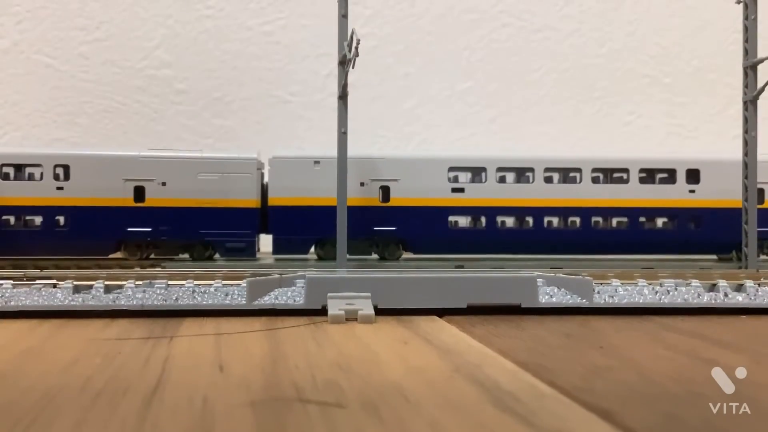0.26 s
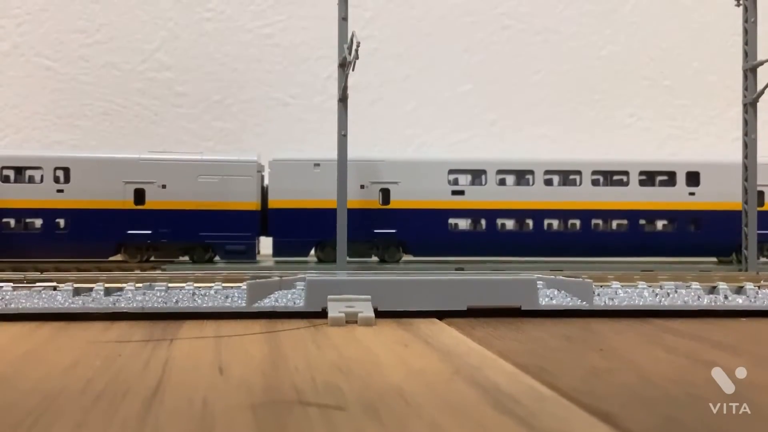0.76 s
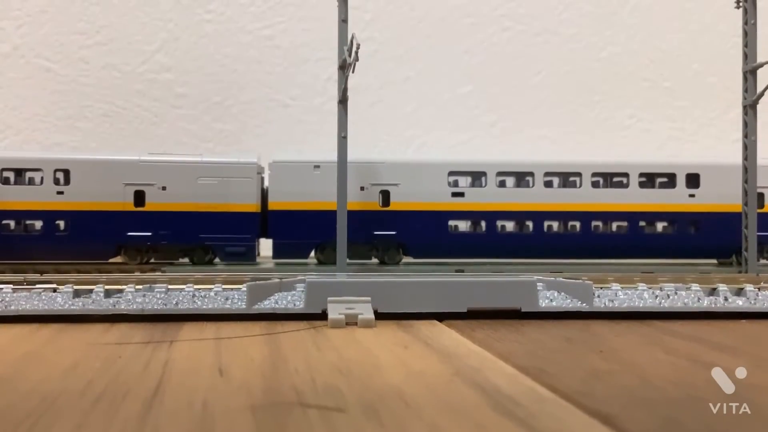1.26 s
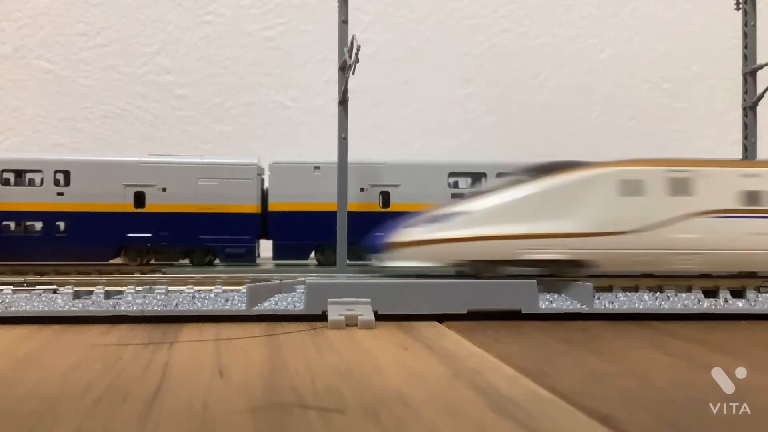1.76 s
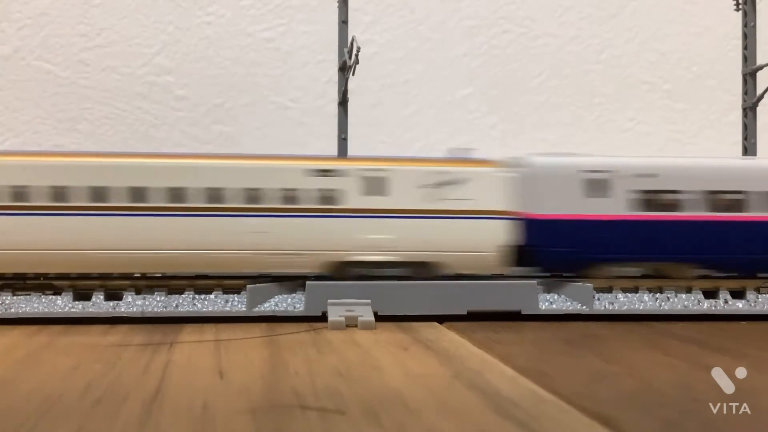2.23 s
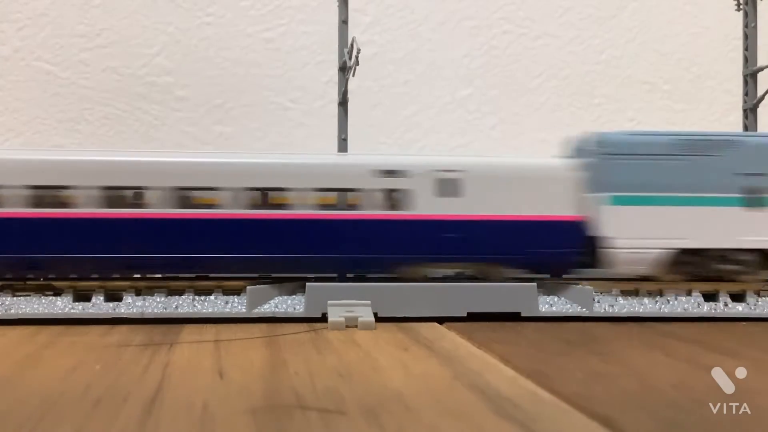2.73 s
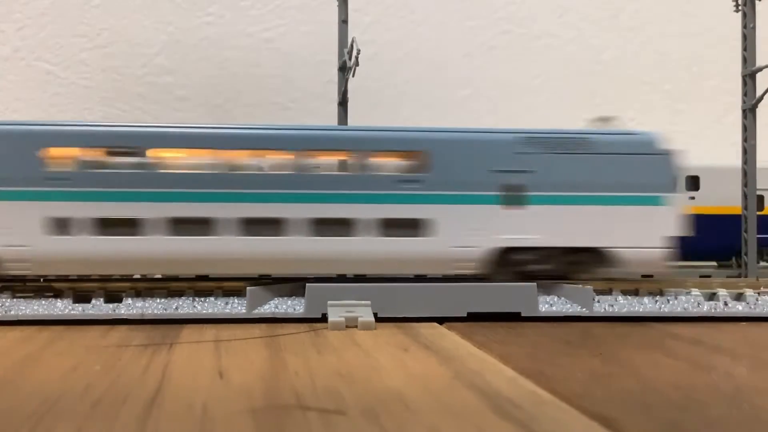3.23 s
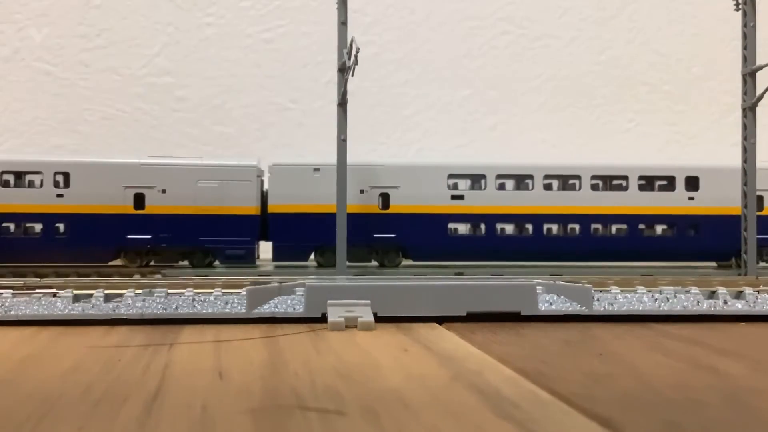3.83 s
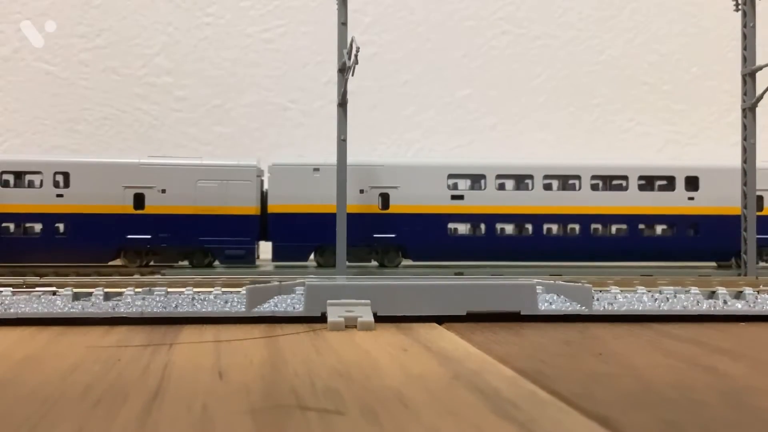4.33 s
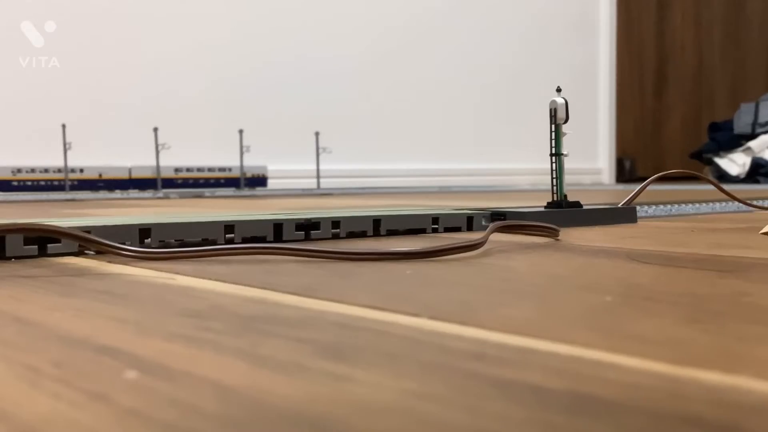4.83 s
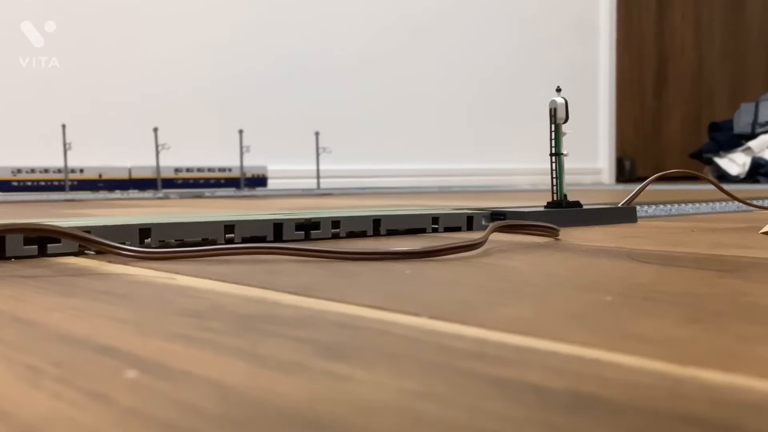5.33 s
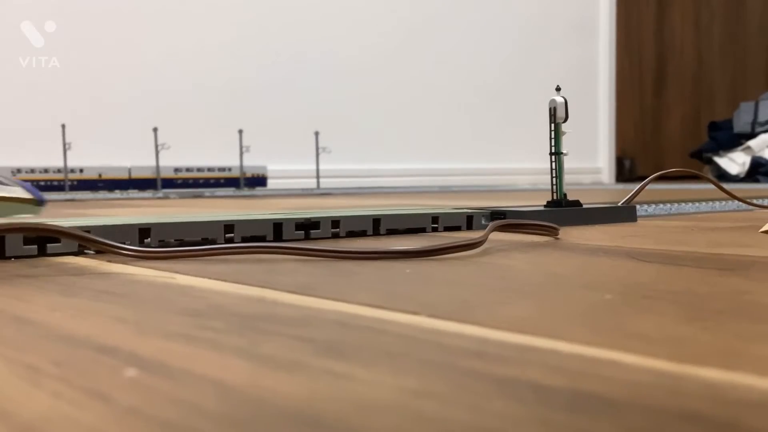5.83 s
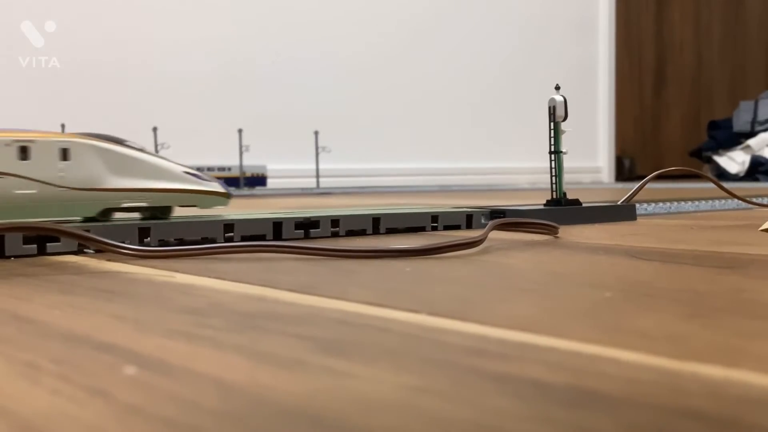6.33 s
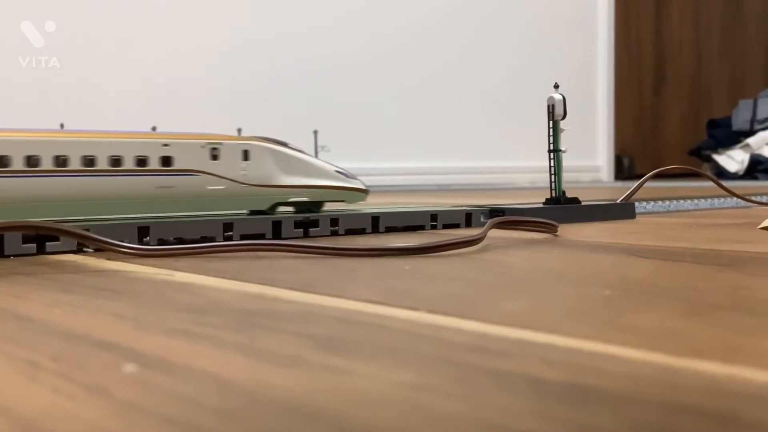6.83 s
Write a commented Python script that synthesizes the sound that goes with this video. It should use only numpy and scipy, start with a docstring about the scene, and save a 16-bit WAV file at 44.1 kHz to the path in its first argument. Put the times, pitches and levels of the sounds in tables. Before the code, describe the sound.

A small model train rolls on plastic track indoors, with a low room hum throughout. From the start its metal wheels hiss, with brief thin ringing from the rails and a hollow resonance from the plastic cars. It grows louder from about 2 seconds, joined by a faint warbling motor whine. From around 2.5 to 4 seconds it passes very close to the microphone: gears whirr and clatter, the motor throbs rapidly, and the bright hiss takes on a downward sweep, loudest between 3 and 4 seconds. The sound eases slightly, then at about 4.6 seconds cuts with a very brief rush to the train heard from across the room. The rolling is now much fainter and steady. From about 4.9 seconds to the end, near 7, the wheels click irregularly over rail joints with slight room echo, most clearly around 5.5 and 6.6 seconds.

```python
"""A model train runs past on plastic track laid on a wooden floor, a hand's width away.
Its small metal wheels hiss and sing on the rails, and its hollow car shells ring. The motor car
whirrs, whines and clatters as it goes by, throbbing once per turn of the drive wheels.
Then, abruptly, the train is heard from across the room, ticking over rail joints.
A low room hum lies under both views."""
import sys
import numpy as np
from scipy import signal
from scipy.fft import rfft, irfft, next_fast_len
from scipy.io import wavfile

SR = 44100
rng = np.random.default_rng(int(sys.argv[2]) if len(sys.argv) > 2 else 0)


def unload_audio(sound):
    """Save the sound as a 16-bit wav file, at the path given as the first command line argument."""
    columns = np.transpose(np.atleast_2d(sound))
    # keep every value between -1 and 1, then stretch to whole-number steps
    steps = np.round(np.clip(columns, -1, 1) * 32767)
    wavfile.write(sys.argv[1], SR, steps.astype(np.int16))


N = 311787
TIME = np.arange(N) / SR
ACROSS_ROOM_S = 4.575   # the listener jumps from trackside to across the room
WHEEL_HZ, PEAK_LOAD_S = 11.75, 3.96   # turn rate of the drive wheels; one moment of greatest load

# Tone of the wheel hiss. Each row: frequency in Hz, relative level in dB.
HISS_SPECTRUM = [(3650, -28), (6200, -5), (6400, -41), (6580, -10.5), (7380, -6), (10600, 2), (12600, -6.5),
                 (14500, -10), (15400, -12), (16000, -28)]
# Sweep of the notch cut by the floor reflection. Each row: time in seconds, cancelled frequency in Hz.
FLOOR_NOTCH = [(2.6, 14600), (2.85, 12500), (3.05, 10300), (3.3, 8800), (3.7, 7700), (4.0, 8160),
               (4.3, 10900)]
# Resonances that swell and fade once, near and far: rails and wheels singing out, and bright # treble peaks
# that rise as the cars leave. Each row: peak time in seconds, length in seconds, # pitch in Hz, bandwidth in
# Hz, level in dB, glide in Hz per second.
RINGING_SWELLS = [(0.025, 0.2, 3420, 200, -39, 0), (0.12, 0.33, 4970, 200, -46, -3),
                  (0.38, 0.47, 3990, 250, -43.5, 0), (0.603, 0.19, 3500, 220, -39.5, 401),
                  (0.85, 0.34, 5270, 400, -39, 900), (1.006, 0.18, 4080, 200, -41, 0),
                  (1.15, 0.19, 5860, 200, -48, 400), (1.344, 0.45, 1677, 320, -42.5, 0.5),
                  (2.05, 0.53, 3220, 260, -39, 499.5), (1.95, 1, 10280, 550, -41.5, 1),
                  (2.4, 0.25, 2840, 280, -42, -0.5), (2.826, 0.19, 1775, 262, -32, -4),
                  (2.85, 0.71, 5250, 700, -32.5, -1200), (3.053, 0.3, 4570, 350, -28.5, -3),
                  (2.88, 0.48, 8530, 1100, -40, -3000), (3.082, 0.24, 11200, 700, -39, -2000),
                  (3.399, 1, 1579, 159, -34, 100), (3.25, 0.63, 3778, 399.3, -27, -350),
                  (3.703, 0.077, 4535, 260, -24, 0), (3.867, 0.34, 5900, 379, -37.5, -1),
                  (3.84, 0.24, 5010, 220, -35, 0), (3.985, 0.041, 3800, 260, -27, 0),
                  (4.1, 0.3, 3170, 220, -36.5, -0.5), (4.12, 0.5, 4480, 550, -35.5, 0.5),
                  (4.13, 0.36, 3350, 150, -36.5, 1), (4.417, 0.26, 3300, 340, -35.5, 600.5),
                  (4.25, 0.4, 2260, 170, -42, 0), (4.036, 0.24, 12000, 800, -39, 8002),
                  (4.17, 0.16, 8600, 250, -37.5, 5), (4.382, 0.58, 8990, 850, -40, 2500),
                  (4.501, 0.75, 2605, 554, -39.5, 0), (5.0, 0.8, 3540, 330, -56, 0),
                  (5.15, 0.52, 2320, 905, -54, -1), (5.534, 0.12, 2370, 900, -54, 4),
                  (5.618, 0.38, 5720, 350, -58, 0), (5.997, 0.14, 2470, 900, -55.5, 0),
                  (6.45, 0.1, 2420, 700, -57, -2.5), (6.753, 0.3, 2300, 400, -55, -700),
                  (6.92, 0.34, 5200, 350, -59.5, 1)]


def wheel_hiss(nearness):
    """Metal wheels hiss on the rails; the floor's echo sweeps a notch, and a parked train adds its own."""
    # Fader ride of the hiss. Each row: time in seconds, relative level in dB.
    hiss_levels = [(0.0, -36.5), (0.09, -37.5), (0.47, -35), (1.59, -33.5), (2.04, -31.5), (2.7, -33.5),
                   (3.21, -34), (3.7, -29.5), (4.37, -35.5), (4.56, -31.5)]
    # Finest hiss, heard only abreast of the motor car.
    # Each row: time in seconds, centre in Hz, relative level in dB.
    sizzle_curve = [(3.58, 13500, -60), (3.66, 13380, -37), (3.78, 13490, -41), (3.95, 14100, -37.5),
                    (4.06, 14600, -43), (4.17, 15000, -60)]
    hiss = colour(contacts(per_s=7000, spread_db=4.5, smooth=0.76), HISS_SPECTRUM)
    notch_hz, = in_time(FLOOR_NOTCH)
    floor_lag_s = 1 / (2 * notch_hz * (1 + 0.012 * drift(3.7)))   # half a cycle late
    parked_lag_s = 0.000286 * nearness ** 0.12
    floor_echo, parked_echo = delayed(hiss, [floor_lag_s, parked_lag_s])
    floor_gain = np.interp(TIME, [2.25, 2.6, 3.2, 3.7], [0, 0.37, 0.37, 0.2257])   # cars block a part
    parked_gain = np.interp(TIME, [3.15, 3.6], [0, 0.068])
    combed = hiss + floor_gain * floor_echo + parked_gain * parked_echo
    combed /= np.sqrt(1 + floor_gain ** 2 + parked_gain ** 2)
    ride_db, = in_time(hiss_levels)
    hiss_db = ride_db + 1.1 + 9.3 * floor_gain - 2.3 * nearness ** 2
    load_db = 1.4 * motor_presence() * throb(lead_s=0.0012) + 0.5 * drift(21)
    sizzle_hz, sizzle_db = in_time(sizzle_curve)
    sizzle = from_db(sizzle_db) * mode_noise(sizzle_hz, width_hz=1500)
    return from_db(load_db) * (from_db(hiss_db) * combed + sizzle)


def gears(level_db, nearness):
    """Gear teeth and loose bogies rattle the motor car; its resonances stand out when it is near."""
    # Knocks of the motor car. Each row: start in seconds, relative level in dB.
    clatter_hits = [(2.5394, -6), (2.7206, -7), (2.9801, -1), (3.031, -2.5), (3.1157, -6), (3.154, 0),
                    (3.3826, -4), (3.408, -3.5), (3.4714, -2), (3.5514, -4.5), (3.712, -5.5), (3.7236, -3),
                    (3.8198, -7), (3.898, -4), (3.9735, -10)]
    # Tone of the whirr, some way off and close up. Each row: frequency in Hz, relative level in dB.
    approach_spectrum = [(1180, -22), (2000, -14.5), (2500, -7), (3270, -2.5), (3680, -4.5), (3950, -1),
                         (4400, -3), (5310, -4), (6040, -8), (6500, -16.5), (8450, -15), (14300, -120)]
    close_spectrum = [(1180, -32.5), (2000, -5), (2450, -7.5), (2770, -10.5), (3010, -4.5), (3260, -9),
                      (3720, 1.3), (4190, -4), (4560, 2), (5230, -12.5), (5920, -9), (6160, -21),
                      (6500, -56), (8450, -32), (14300, -120)]
    rattle = contacts(per_s=2400, spread_db=3.5, smooth=0.51)
    knocks = np.zeros(N)
    for start_s, db in clatter_hits:
        add(knocks, start_s, from_db(db - 10.5) * chatter(ring_s=0.0069, rebound=0.32, rise_s=0.0016))
    approach = colour(contacts(per_s=8000, spread_db=2.0, smooth=1.08), approach_spectrum)
    close_share = nearness ** 1.1
    whirr = np.sqrt(1 - close_share) * approach + np.sqrt(close_share) * colour(rattle, close_spectrum)
    load_db = 1.8 * motor_presence() * throb(lead_s=0)
    flutter_db = 0.78 * drift(46)
    return from_db(level_db + load_db + flutter_db - 0.1) * whirr + colour(knocks, close_spectrum)


def chassis(whirr_db):
    """The lowest mode of the motor car rings beneath its whirr."""
    return motor_presence() * from_db(whirr_db - 21.5) * mode_noise(hz=1140, width_hz=123)


def motor_whine(bed_hz=540, bed_width_hz=125):
    """The motor flicks up in pitch once per wheel turn, fading as it leaves the track bed's resonance."""
    # Path of the whine. Each row: time in seconds, pitch under load in Hz, relative level in dB,
    # typical upward flick in Hz.
    whine_curve = [(2.1, 540, -58, 60), (2.27, 541, -48, 60.7), (2.6, 533, -53, 78),
                   (2.9, 513, -49.5, 110.7), (3.05, 526, -45, 109.7), (3.24, 547, -42, 60),
                   (3.35, 549, -45, 130), (3.5, 549, -41, 70), (3.65, 525, -46, 130),
                   (3.83, 524, -43.5, 185), (4.02, 533, -46.5, 150), (4.2, 531.4, -50, 129.6),
                   (4.36, 536, -42, 70), (4.56, 538, -43, 70)]
    loaded_hz, level_db, flick_hz = in_time(whine_curve)
    slack = ((1 + throb(lead_s=0.055)) / 2) ** 3
    second_turn = np.sin(np.pi * WHEEL_HZ * (TIME - PEAK_LOAD_S))   # every other flick goes further
    flutter_hz = 12 * drift(55)
    reach = 1 + 0.18 * second_turn + 0.173 * drift(8.03)
    pitch_hz = loaded_hz + flick_hz * slack * reach + flutter_hz
    bed_gain = 1 / np.hypot(1, 2 * (pitch_hz - bed_hz) / bed_width_hz)
    tone = np.sqrt(2) * np.sin(2 * np.pi * np.cumsum(pitch_hz) / SR)
    rough_db = 2.6 * drift(45)
    return from_db(level_db + rough_db) * bed_gain * tone


def throb(lead_s):
    """The motor's load swings once per turn of the drive wheels."""
    return np.cos(2 * np.pi * WHEEL_HZ * (TIME - PEAK_LOAD_S + lead_s))


def motor_presence():
    """How much of the motor car's throb and chassis ring is heard: it comes in late and lingers."""
    return np.interp(TIME, [2.3, 2.9, 3.8, 4.5], [0, 0.7, 1, 0.9])


def car_shells():
    """The hollow plastic bodies ring, each car at a slightly different, wandering pitch."""
    # Ring of the passing shells. Each row: time in seconds, relative level in dB, centre in Hz.
    shell_curve = [(0.0, -36.5, 1850), (0.11, -36.5, 1810), (0.4, -38, 1830), (0.7, -41, 1970),
                   (1.1, -43, 1950), (1.7, -36, 1920), (2.27, -31.5, 1900), (2.4, -33, 1900),
                   (2.6, -32.5, 1900), (2.83, -27.5, 1830), (3.05, -27.5, 1750), (3.33, -29.5, 1740),
                   (3.68, -30, 1800), (4.0, -42, 2130), (4.56, -44, 2140)]
    level_db, centre_hz = in_time(shell_curve)
    wander_hz = 35 * drift(5)
    return from_db(level_db - 3.6 + 0.5 * drift(15)) * mode_noise(centre_hz + wander_hz, width_hz=360)


def singing_rails():
    """Rails and wheels ring faintly, swelling by chance; now and then a louder resonance swells out above them."""
    # Rail and wheel modes. Each row: pitch in Hz, bandwidth in Hz, relative level in dB.
    rail_modes = [(1680, 140, -52.5), (2327, 260, -52.5), (3494, 76, -57), (4014, 500, -49),
                  (5380, 530, -50)]
    singing = flares([row for row in RINGING_SWELLS if row[0] < ACROSS_ROOM_S])
    for hz, width_hz, db in rail_modes:
        swell_db = 10.5 * np.tanh(drift(1.46))
        singing += from_db(db - 3.5 + swell_db) * mode_noise(hz, width_hz)
    return singing


def track_bed():
    """The hollow track bed drones and rumbles under the wheels; the floorboards murmur."""
    # Tone of the floorboards. Each row: frequency in Hz, relative level in dB.
    board_spectrum = [(120, -49), (200, -42), (247, -17), (329, -34), (383, -19), (434, -20), (481, -13),
                      (541, -10.5), (758, -8.5), (1090, -5), (1290, -7), (1500, -1.5), (1950, -2.5),
                      (3300, -120)]
    # Hollow rumbles under the approaching train. Each row: peak time in seconds, length in seconds,
    # pitch in Hz, bandwidth in Hz, level in dB, glide in Hz per second.
    rumbles = [(0.2, 0.5, 630, 90, -48, 2), (0.31, 0.32, 875, 340, -43, 2), (0.62, 0.26, 527, 110, -47, 0),
               (0.99, 0.16, 719, 160, -43.5, 0), (1.22, 0.37, 622, 90, -53, -200),
               (2.9, 1.09, 1040, 260, -47.5, 0)]
    drone_db = np.interp(TIME, [2.0, 2.8], [-58.5, -54.5])
    drone = from_db(drone_db) * mode_noise(hz=603.5, width_hz=296)
    boards = from_db(-43) * colour(rng.standard_normal(N), board_spectrum)
    return drone + boards + flares(rumbles)


def rail_joints(room_t60_s=0.42, room_db=-8, crossover_hz=8500):
    """Far wheels double-tick over joints, each with its own ping and hardness, into a faint room tail."""
    # Joint hits. Each row: start in seconds, relative level in dB, ping pitch in Hz,
    # brightness in dB, ping gain in dB, rattle decay in seconds.
    joint_hits = [(4.854, -37, 4450, 12, -1, 0.0015), (4.993, -38, 4150, 11, -3, .0014),
                  (5.361, -28.5, 4370, -6, -6, .0014), (5.5045, -21.5, 4650, -8, 2, 0.0015),
                  (5.6087, -32, 4610, -2, 0, .0014), (5.961, -33, 4130, 1, 1, 0.003),
                  (6.0082, -31.5, 4370, -4, -4, .003), (6.1652, -30.5, 5170, -6, 10, 0.0028),
                  (6.285, -36, 4530, 3, -3, .002), (6.396, -26, 6900, -10, 0, .0014),
                  (6.4474, -29, 5220, -14, 2, 0.0013), (6.557, -23.5, 6700, -14, -2, 0.0023),
                  (6.718, -28, 5200, -3, -1, .0018), (6.8865, -29.5, 4700, 1, 7, .0016),
                  (6.9175, -29.5, 4350, -4, 9, .0017)]
    # Tone of all the ticks. Each row: frequency in Hz, relative level in dB.
    tick_spectrum = [(500, -16), (2000, -4.5), (4500, 3.5), (5700, 1.5), (6250, -1.5), (6750, 1.5),
                     (8100, -1), (9100, 2), (11000, -8), (13000, -15), (16000, -18)]
    lowpass = signal.butter(2, crossover_hz, fs=SR, output="sos")
    highpass = signal.butter(2, crossover_hz, "high", fs=SR, output="sos")
    ticks = np.zeros(N)
    for start_s, db, ping_hz, bright_db, ping_db, ring_s in joint_hits:
        tick = chatter(ring_s, rebound=0.45, rise_s=0.00021)
        ping = from_db(ping_db) * resonate(tick, ping_hz, width_hz=280)
        body = signal.sosfilt(lowpass, tick + ping)
        edge = from_db(bright_db) * signal.sosfilt(highpass, tick)
        add(ticks, start_s, from_db(db - 2.0) * (body - edge))
    ticks = colour(ticks, tick_spectrum)
    tail = rng.standard_normal(SR // 2) * from_db(-60 * TIME[:SR // 2] / room_t60_s)
    return ticks + from_db(room_db) * signal.fftconvolve(ticks, tail / np.linalg.norm(tail))[:N]


def far_train(rush_s=4.588, attack_s=0.0043, hold_s=0.033, release_db_per_s=260):
    """Distant rolling, dulled and smoothed by the room; a brief rush of hiss opens this view, and a fainter
    hiss slowly fades."""
    # Tones of the roll and of the rush. Each row: frequency in Hz, relative level in dB.
    roll_spectrum = [(150, -25), (250, -4), (319, -15), (444, 0.5), (519, -6.5), (600, -6.5), (710, -4),
                     (1120, -3), (1350, -3), (2020, 0.5), (3910, -0.5), (5200, -2), (6300, -9.5),
                     (6750, -7.5), (9010, -6), (16000, -42)]
    rush_spectrum = [(300, -46), (1500, -1.5), (2500, 0), (3600, 11), (6500, -7), (10000, -1), (12500, -11),
                     (16000, -14)]
    roll_db = -47 + 1.15 * drift(24)
    roll = from_db(roll_db) * colour(contacts(per_s=4000, spread_db=3.5, smooth=1.76), roll_spectrum)
    since_s = np.maximum(TIME - rush_s, 0)
    hiss_db = -61.5 - 1.5 * since_s + 1.5 * drift(1.4)
    hiss = from_db(hiss_db) * colour(contacts(per_s=1500, spread_db=4.5, smooth=0.9), HISS_SPECTRUM)
    rush_db = -34 - release_db_per_s * np.maximum(since_s - hold_s, 0)
    envelope = np.minimum(since_s / attack_s, 1) * from_db(rush_db)
    rush = envelope * colour(rng.standard_normal(N), rush_spectrum)
    return roll + hiss + rush


def phasing(x):
    """One hollow sinks through the treble as the cars arrive; a narrower one follows as they leave."""
    # The second hollow. Each row: time in seconds, centre in Hz, depth from 0 to 1.
    hollow_curve = [(3.6, 12750, 0.4), (3.72, 11800, 0.7), (3.92, 10600, 0.4), (4.12, 10500, 0.7),
                    (4.35, 10960, 0.7), (4.56, 10560, 0.7)]
    sinking_hz, = in_time(FLOOR_NOTCH)
    scooped = x - 0.5 * bell(peak_s=3.0, length_s=0.7) * glide(x, sinking_hz, width_hz=2000)
    hollow_hz, depth = in_time(hollow_curve)
    return scooped - depth * glide(scooped, hollow_hz, width_hz=980)


def reflections(x, echo_db, shortest_s, longest_s, wander, count=8):
    """Weak echoes whose paths change as the train moves, so that fine peaks shift through the sound."""
    mean_lags_s = np.geomspace(shortest_s, longest_s, count) * rng.uniform(0.9, 1.1, count)
    lags_s = [lag_s * (1 + wander * drift(0.43)) for lag_s in mean_lags_s]
    echoes = sum((-1) ** k * echo for k, echo in enumerate(delayed(x, lags_s))) / np.sqrt(count)
    return (x + from_db(echo_db) * echoes) / np.hypot(1, from_db(echo_db))


def room_hum():
    """Low wavering tones over a soft rumble with one room mode and no deep bass."""
    # Tones of the hum. Each row: pitch in Hz, relative level in dB.
    hum_tones = [(59.2, -49.5), (100, -59), (117.6, -53.5)]
    # Tone of the room's rumble. Each row: frequency in Hz, relative level in dB.
    rumble_spectrum = [(15, -51), (25, -27), (35, -40), (41, -28), (65, 2.5), (109, 1.5), (125, -13.5),
                       (141, -13), (199, -16), (249, -13.5), (328, -20), (400, -18.5), (520, -38),
                       (880, -120)]
    tones = np.zeros(N)
    for hz, db in hum_tones:
        amplitude = np.sqrt(2) * from_db(db + 2.4 * drift(2.1))
        tones += amplitude * np.sin(2 * np.pi * hz * TIME + 0.45 * drift(1.7))
    rumble = from_db(-45) * colour(rng.standard_normal(N), rumble_spectrum)
    room_mode = from_db(-58.5) * mode_noise(hz=152, width_hz=16)
    return tones + signal.sosfilt(signal.butter(6, 48, "high", fs=SR, output="sos"), rumble + room_mode)


def contacts(per_s, spread_db, smooth):
    """Tiny impacts of uneven size on top of smooth friction."""
    sizes = from_db(spread_db * np.minimum(rng.exponential(1, N), 4)) * rng.choice([-1, 1], N)
    impacts = unit_power(sizes * (rng.random(N) < per_s / SR))
    return unit_power(impacts + smooth * rng.standard_normal(N))


def chatter(ring_s, rebound, rise_s):
    """A wheel drops into a gap and strikes the next rail end: two short rattles."""
    t = TIME[:SR // 20]
    since_rebound = t - rng.uniform(0.002552, 0.002581)
    second_hit = rebound * (since_rebound > 0) * np.exp(-np.abs(since_rebound) / ring_s)
    envelope = (1 - np.exp(-t / rise_s)) * (np.exp(-t / ring_s) + second_hit)
    return envelope * np.tanh(rng.standard_normal(len(t)))


def flares(rows):
    """Resonances that each swell and fade once, some gliding."""
    return sum(from_db(db) * bell(peak_s, length_s) * mode_noise(hz + slope * (TIME - peak_s), width_hz)
               for peak_s, length_s, hz, width_hz, db, slope in rows)


def mode_noise(hz, width_hz):
    """A mode shaken at random, with steep skirts; its centre may move."""
    lowpass = signal.butter(2, width_hz / 2, fs=SR, output="sos")
    sway = signal.sosfilt(lowpass, rng.standard_normal((2, N)))
    phase = 2 * np.pi * np.cumsum(hz * np.ones(N)) / SR
    return unit_power(sway[0] * np.cos(phase) + sway[1] * np.sin(phase))


def resonate(x, hz, width_hz):
    """One resonance with unity gain at its peak."""
    r = np.exp(-np.pi * width_hz / SR)
    poles = [1, -2 * r * np.cos(2 * np.pi * hz / SR), r * r]
    return signal.lfilter(np.array([1, 0, -1]) * (1 - r * r) / 2, poles, x)


def glide(x, hz, width_hz, block=128):
    """A swept resonance with unity gain at its peak."""
    out, state = np.zeros(N), np.zeros(2)
    r = np.exp(-np.pi * width_hz / SR)
    zeros = np.array([1, 0, -1]) * (1 - r * r) / 2
    for i in range(0, N, block):
        poles = [1, -(1 + r * r) * np.cos(2 * np.pi * hz[i] / SR), r * r]
        out[i:i + block], state = signal.lfilter(zeros, poles, x[i:i + block], zi=state)
    return out


def colour(x, spectrum):
    """Equalise by a spectrum, keeping the power of white noise."""
    size = next_fast_len(N)
    hz, db = np.transpose(spectrum)
    bins_hz = np.arange(size // 2 + 1) * SR / size
    gain = from_db(np.interp(np.log(bins_hz + 1), np.log(hz), db))
    return irfft(rfft(x, size) * unit_power(gain), size)[:N]


def delayed(x, lags_s):
    """Copies of a sound, each arriving after its own changing lag."""
    oversampled = signal.resample_poly(x, 4, 1)
    fine_s = np.arange(len(oversampled)) / (4 * SR)
    return [np.interp(TIME - lag_s, fine_s, oversampled) for lag_s in lags_s]


def drift(rate_hz, step=40):
    """Smooth random wander with a spread of 1."""
    r = np.exp(-2 * np.pi * rate_hz * step / SR)
    slow = signal.lfilter([1], [1, -2 * r, r * r], rng.standard_normal(N // step + 2002))[2000:]
    return np.interp(np.arange(N) / step, np.arange(len(slow)), unit_power(slow))


def pass_by(far_db, close_db, from_s, until_s, rise_db_per_s, fall_db_per_s):
    """Level in dB of something that approaches, stays close for a while and leaves."""
    drop_db = rise_db_per_s * np.maximum(from_s - TIME, 0) + fall_db_per_s * np.maximum(TIME - until_s, 0)
    return np.maximum(far_db, close_db - drop_db)


def bell(peak_s, length_s):
    """A smooth swell and fade around a moment."""
    return np.exp(-(2 * (TIME - peak_s) / length_s) ** 2)


def in_time(rows):
    """Breakpoints to one automation curve per column."""
    times_s, *columns = np.transpose(rows)
    return [np.interp(TIME, times_s, column) for column in columns]


def add(out, start_s, sound):
    """Mix a sound in at a given time."""
    at = int(start_s * SR)
    out[at:at + len(sound)] += sound[:max(N - at, 0)]


def from_db(db):
    """Decibels to gain."""
    return 10 ** (np.asarray(db) / 20)


def unit_power(x):
    """Scale to an RMS of 1."""
    return x / np.sqrt(np.mean(x ** 2) + 1e-20)


def scene():
    """The close pass, then a hard cut to the train across the room."""
    whirr_db = pass_by(far_db=-36, close_db=-24, from_s=3.19, until_s=3.85,
                       rise_db_per_s=6.85, fall_db_per_s=17.6)
    nearness = 1 / np.hypot(1, (TIME - 3.73) / 0.34)   # 1 when the motor car is abreast
    train = chassis(whirr_db) + phasing(gears(whirr_db, nearness) + wheel_hiss(nearness)) + car_shells()
    hum = room_hum()
    trackside = reflections(train, echo_db=-8, shortest_s=0.0015, longest_s=0.012, wander=0.0307)
    trackside += track_bed() + motor_whine() + singing_rails() + hum
    across_room = reflections(far_train(), echo_db=-11, shortest_s=0.002, longest_s=0.013, wander=0.0298)
    far_swells = flares([row for row in RINGING_SWELLS if row[0] > ACROSS_ROOM_S])
    across_room += far_swells + rail_joints() + from_db(-3.5) * hum
    return np.where(TIME < ACROSS_ROOM_S, trackside, across_room)[None]


def record(dry):
    """A steep low-pass cuts the top above 15.8 kHz."""
    return signal.sosfilt(signal.ellip(12, 0.1, 80, 15800, fs=SR, output="sos"), dry)


dry = scene()
out = record(dry)
unload_audio(out)
```